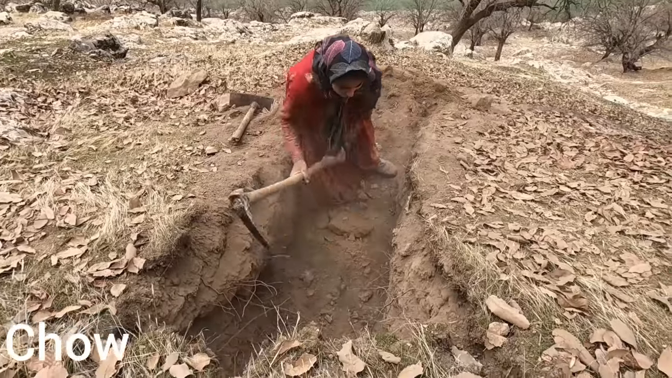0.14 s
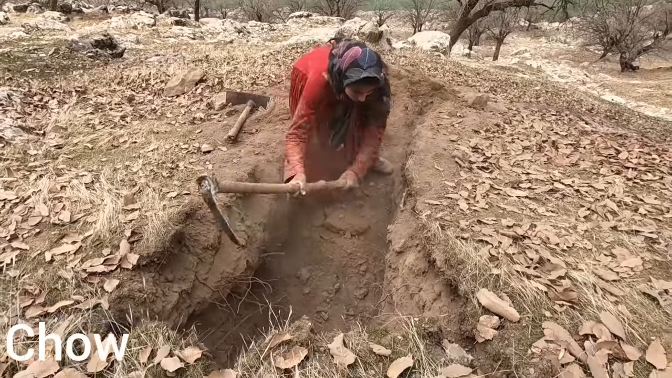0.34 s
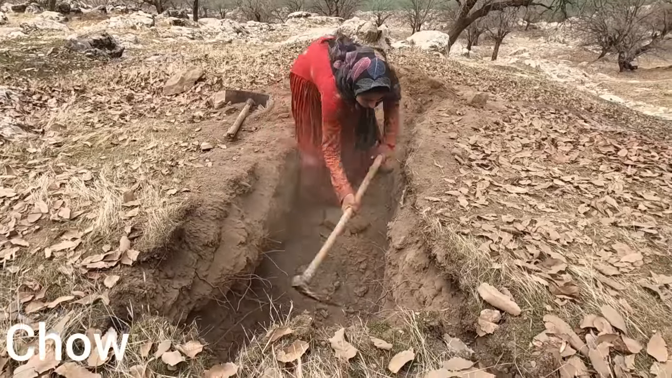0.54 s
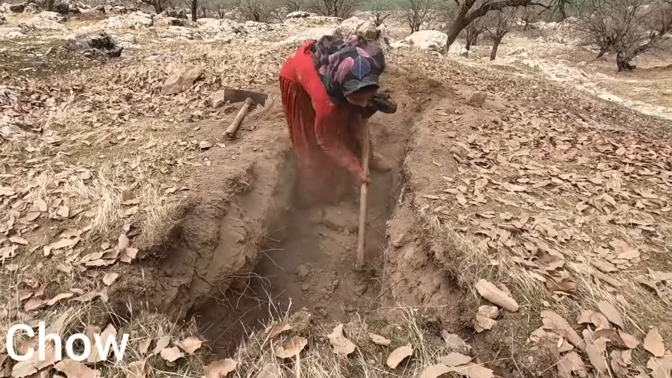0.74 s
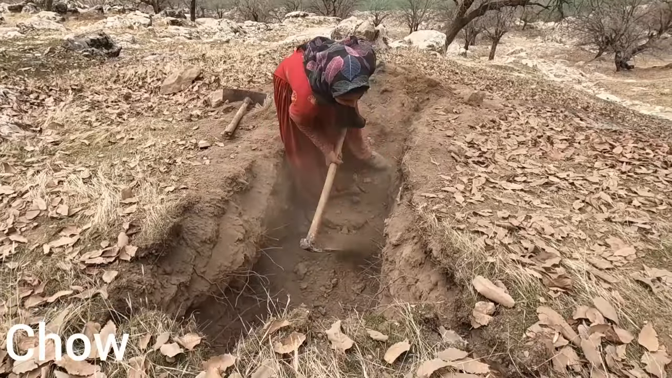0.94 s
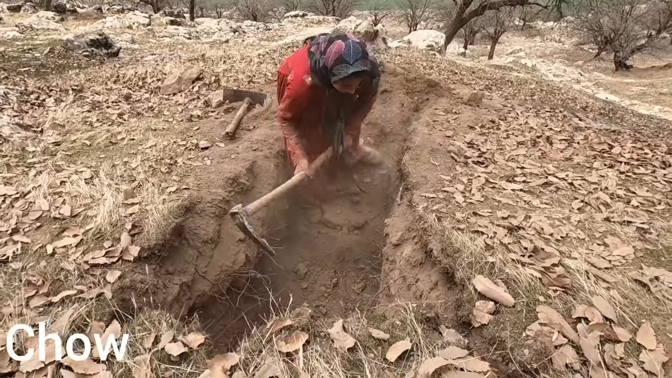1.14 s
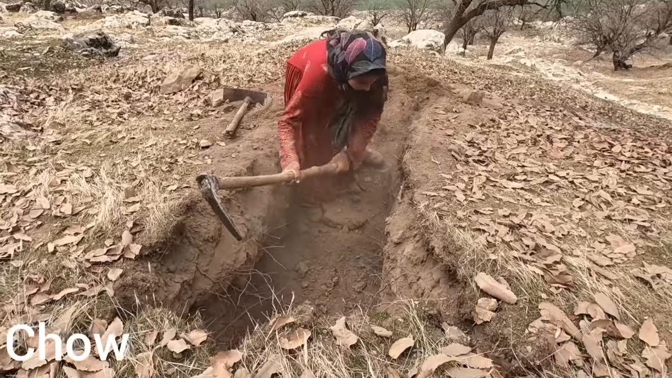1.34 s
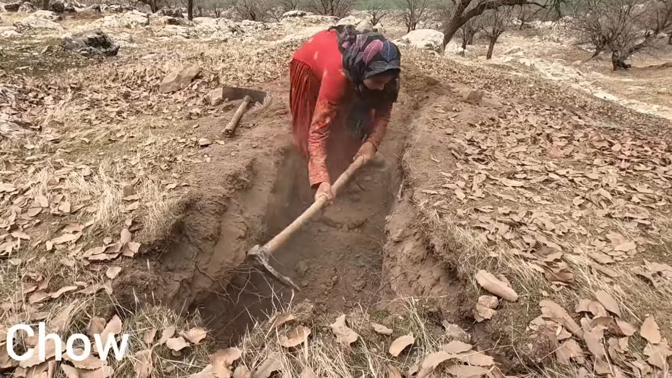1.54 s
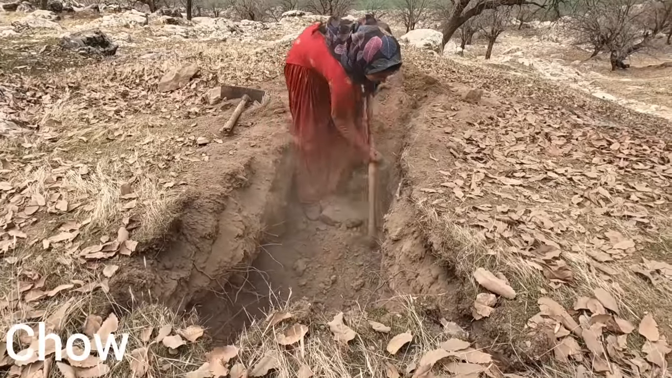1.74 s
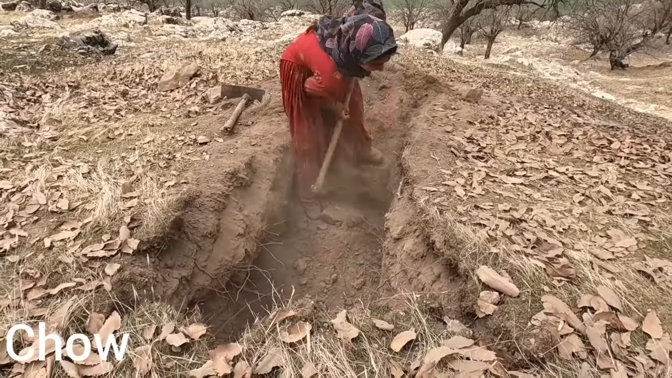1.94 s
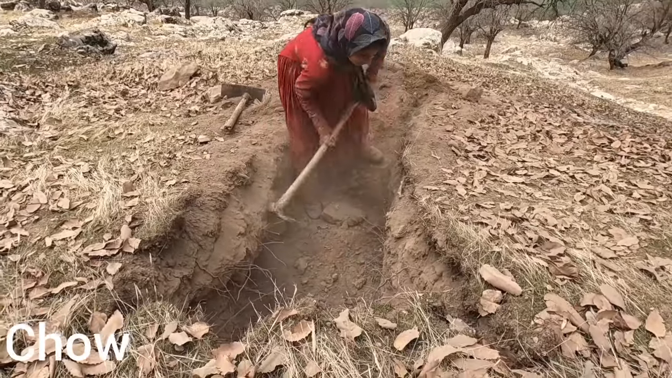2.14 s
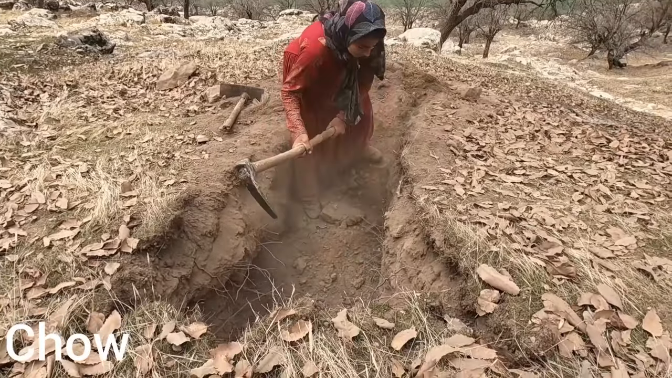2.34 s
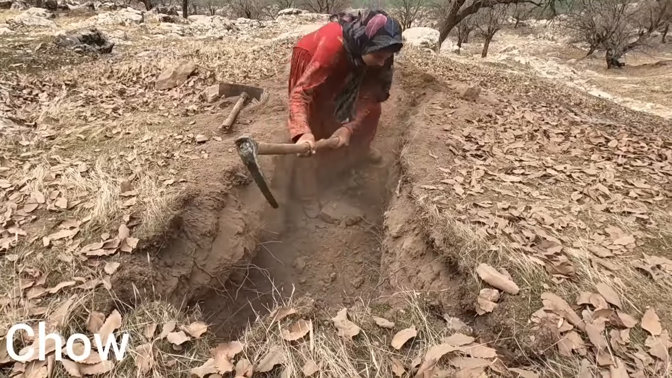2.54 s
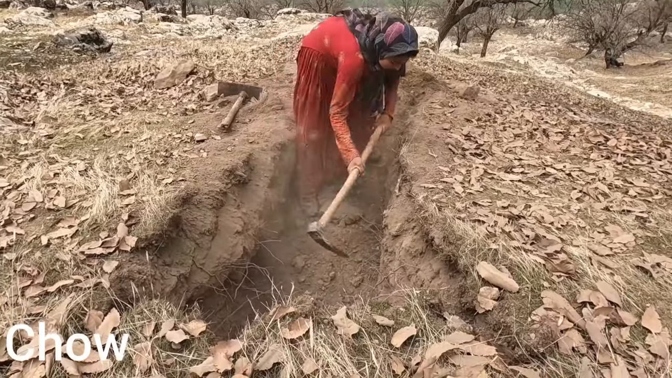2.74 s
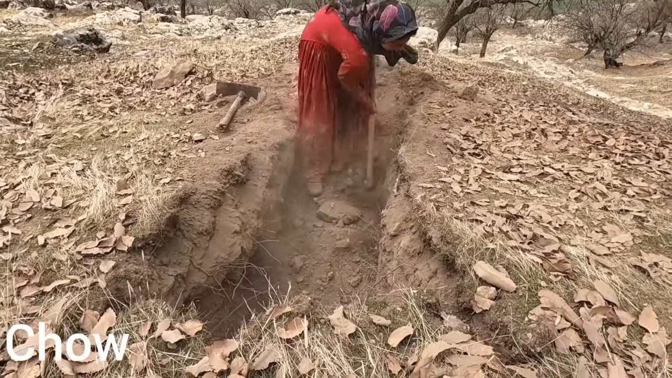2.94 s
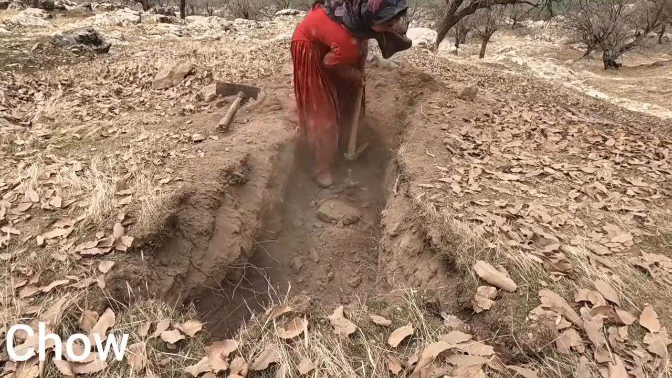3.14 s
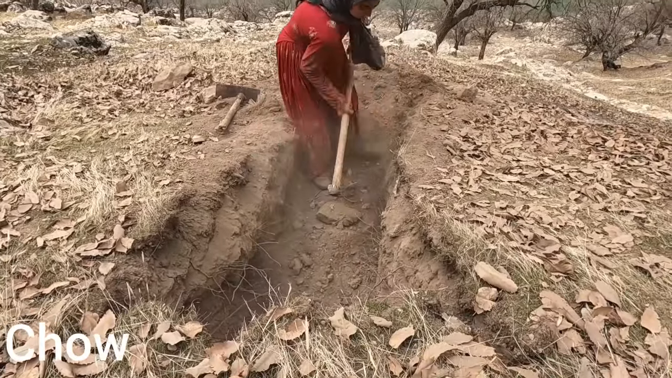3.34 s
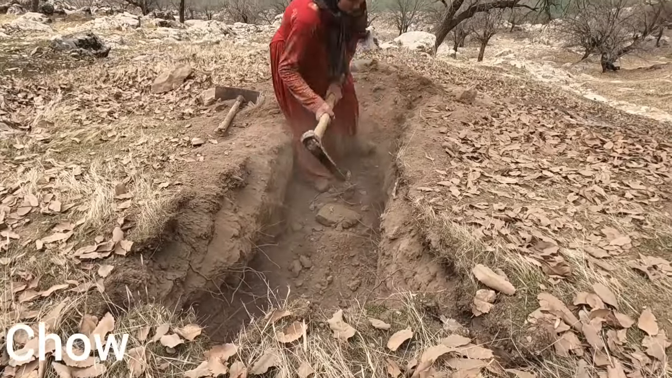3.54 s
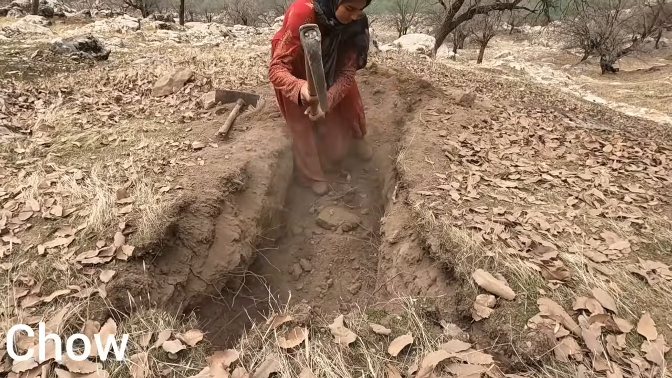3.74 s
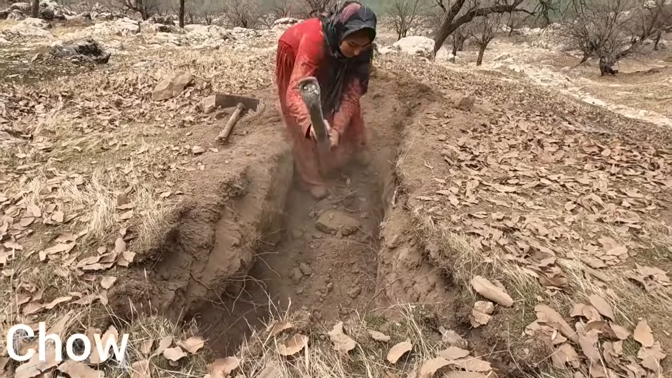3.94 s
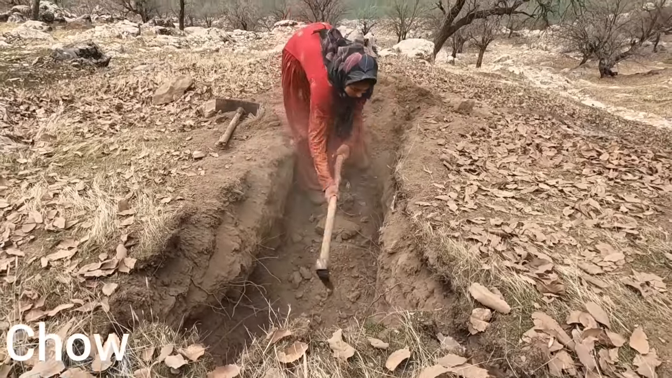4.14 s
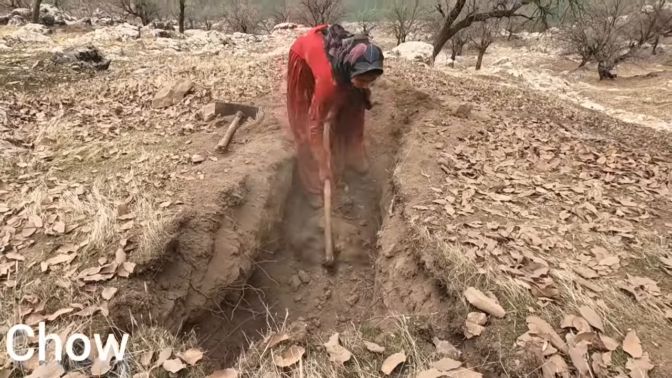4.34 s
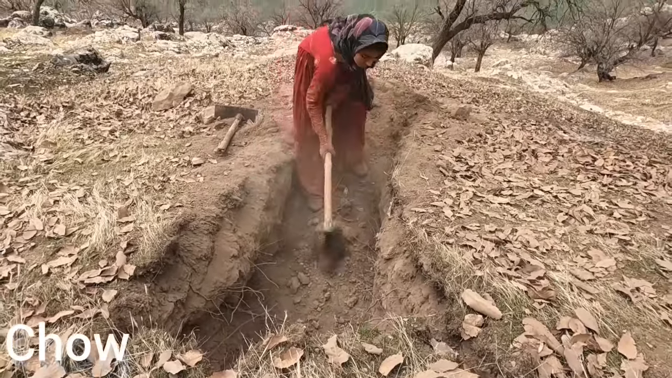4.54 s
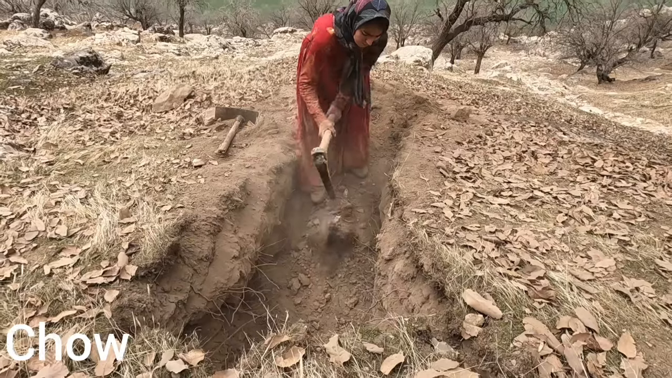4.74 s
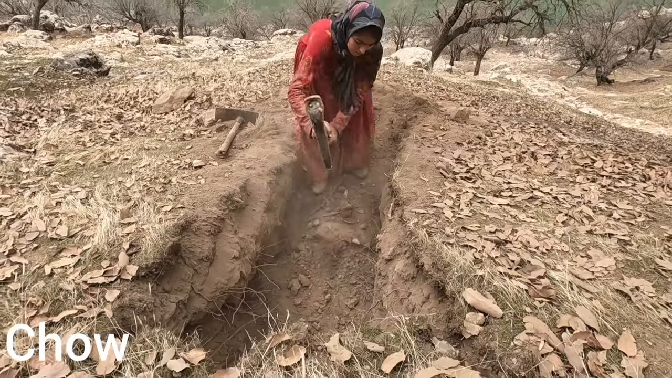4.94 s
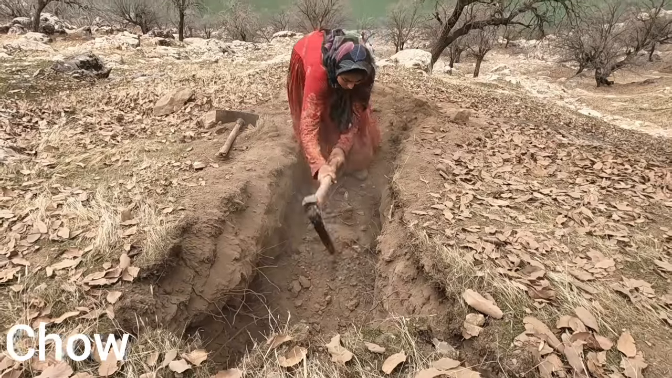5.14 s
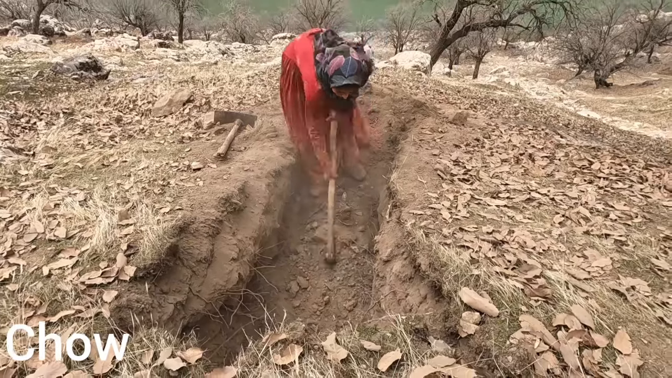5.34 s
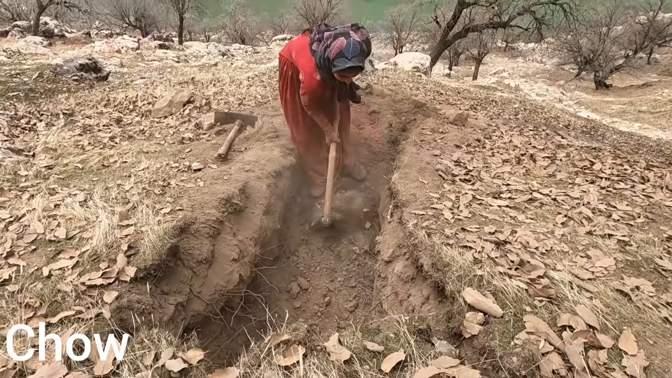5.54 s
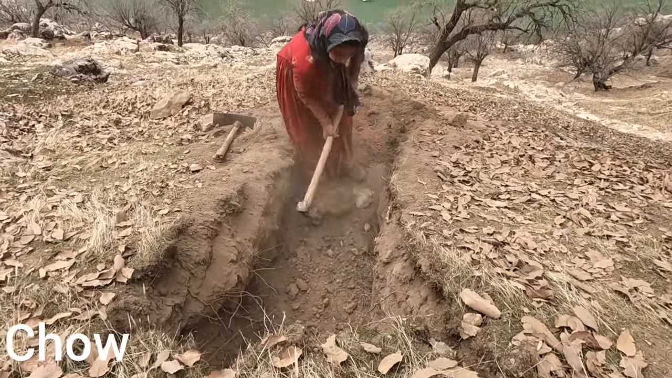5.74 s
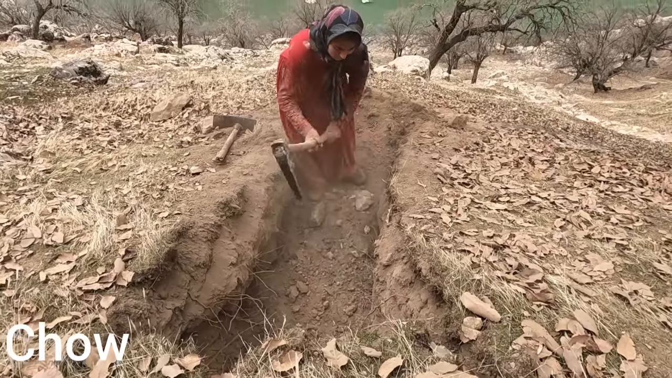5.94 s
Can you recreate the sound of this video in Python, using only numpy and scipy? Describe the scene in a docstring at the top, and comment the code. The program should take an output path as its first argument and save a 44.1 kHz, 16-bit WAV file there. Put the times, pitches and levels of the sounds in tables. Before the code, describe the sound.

A pickaxe digs dry, stony ground outdoors: five blows thud, crunch and knock on buried stones, with loose earth trickling down between them.

```python
"""On an open hillside a pickaxe digs a trench in dry, stony soil with five blows, heard in stereo.
Each blow crunches through grit (bursts of grains), knocks on buried stones (damped modes of the pick
under rough noise) and thuds into the ground (low damped swings). Between blows loosened earth trickles
and clods and pebbles fall back (filtered grains and ringing clicks). A light wind rumbles and a faint
wash lies behind it (filtered noise), and the trench walls scatter a short, weak tail."""
import sys
import numpy as np
from scipy import signal
from scipy.fft import rfft, irfft
from scipy.io import wavfile

SR = 44100
rng = np.random.default_rng(int(sys.argv[2]) if len(sys.argv) > 2 else 0)


def file_out(sig):
    """Save sig as 16-bit WAV at sys.argv[1]."""
    # one column per channel
    cols = np.atleast_2d(sig).T
    # limit, then scale
    lim = np.clip(cols, -1, 1)
    pcm = np.round(lim * 32767).astype(np.int16)
    wavfile.write(sys.argv[1], SR, pcm)


N = 264159
TIME = np.arange(N) / SR
BRIEF = TIME[:SR // 3]  # time axis of one short event


def gain_of(db):
    """Level: decibels become an amplitude ratio."""
    return 10 ** (np.asarray(db) / 20)


def evened(x):
    """Normalisation: scales a signal to rms 1."""
    return x / np.sqrt(np.mean(x ** 2) + 1e-20)


def read(points, hz):
    """Interpolation: reads a curve on a log-frequency axis."""
    point_hz, value = np.transpose(points)
    return np.interp(np.log(hz + 1), np.log(point_hz), value)


def add(mix, s, sound):
    """Superposition: mixes a sound in at time s."""
    part = mix[max(round(s * SR), 0):][:len(sound)]
    part += sound[:len(part)]


def coloured(x, points):
    """Spectral shaping: filters a steady texture by a curve in dB, at rms 1."""
    hz = np.fft.rfftfreq(len(x), 1 / SR)
    spectrum = rfft(x) * gain_of(read(points, hz))
    return evened(irfft(spectrum, len(x)))


def shaped(texture, envelope):
    """Amplitude modulation: lays an envelope on a texture, keeping the envelope's energy."""
    return evened(texture * envelope) * np.sqrt(np.mean(envelope ** 2))


def grains(per_s, spread_db, size):
    """Shot noise: tiny impacts at random times, of random sign and strength."""
    strength = gain_of(spread_db * np.minimum(rng.exponential(1, size), 4))
    sign = rng.choice([-1, 1], size)
    return strength * sign * (rng.random(size) < per_s / SR)


def swell(peak_s):
    """Transient force: a push builds up to 1 at peak_s and dies away."""
    u = BRIEF / peak_s
    return (u * np.exp(1 - u)) ** 2


def bump(hz, centre_hz, octaves):
    """Resonance: a gain of 1 at its centre that falls to half this many octaves away."""
    return 1 / (1 + (np.log2((hz + 1) / centre_hz) / octaves) ** 2)


# Gusts on the microphone. Each row: time of the peak in seconds, level in dB, half-width in seconds
# (where the gust has fallen to 1/e).
GUSTS = [(0.2, -48.5, 0.55), (2.15, -67, 0.2), (3.08, -50, .12), (4.08, -56, 0.17), (4.5, -50.5, 0.18),
         (5.95, -52.5, 0.59)]
CALM_DB = -73.5  # the breeze between gusts


def breeze():
    """Unsteady flow: the wind's strength is a calm with smooth gusts added."""
    gusts = sum(gain_of(db) * np.exp(-((TIME - s) / width_s) ** 2) for s, db, width_s in GUSTS)
    return gain_of(CALM_DB) + gusts


# Spectrum of the open hillside. Each row: frequency in Hz, relative level in dB per Hz.
AIR = [(25, -2.5), (60, -15), (100, -28.5), (170, -3.5), (300, -11), (450, -15), (700, -21.5),
       (1000, -15.5), (1300, -11.5), (1800, -18), (2400, -24), (3400, -36.5), (5500, -31.5), (7800, -28.5),
       (9500, -44), (16000, -51.5)]
AIR_DB = -62.5


def hillside(apart_db=-9, drift_db=0.3):
    """Diffuse field: a faint wash drifts with the breeze, partly incoherent between the ports."""
    shared, apart = (coloured(rng.standard_normal(N), AIR) for _ in range(2))
    apart = signal.lfilter(*signal.butter(1, 500, "high", fs=SR), apart)
    windiness = np.log(breeze())
    swelling = gain_of(drift_db * evened(windiness - windiness.mean()))
    wash = shared + gain_of(apart_db) * np.array([apart, -apart])
    return gain_of(AIR_DB) * swelling * wash


# Spectrum of the wind's rumble. Each row: frequency in Hz, relative level in dB per Hz.
GUST = [(10, 1.5), (30, 1.5), (75, 6.5), (130, -18), (250, -20.5), (600, -55.5), (2000, -75.5)]


def wind(apart_db=-14):
    """Turbulence noise: low buffeting follows the gusts, partly incoherent between the ports."""
    shared, apart = (coloured(rng.standard_normal(N), GUST) for _ in range(2))
    return breeze() * (shared + gain_of(apart_db) * np.array([apart, -apart]))


def scatter(x, near_db=-15, far_db=-36, far_t60=0.54):
    """Reverberation: trench walls and slope scatter a short, weak tail, incoherent between the ports."""
    wall_t60 = 0.035
    tails = []
    for db, t60 in ((near_db, wall_t60), (far_db, far_t60)):
        decaying = rng.standard_normal((2, len(BRIEF))) * gain_of(-60 * BRIEF / t60)
        tails.append(gain_of(db) * evened(decaying) / np.sqrt(len(BRIEF)))  # unit energy times its gain
    tail = signal.lfilter(*signal.butter(2, 600, "high", fs=SR), sum(tails))
    return signal.fftconvolve(x[None], tail, axes=1)[:, :N]


# Treble lost by a small click on its way into the microphone. Each row: frequency in Hz, gain in dB.
DULLING = [(4000, 4), (7800, 3), (9500, -10.5), (12000, -13), (16000, -38)]


def click(hz, t60, octaves, size=3072, rise_s=0.00068, snap=0.79, snap_s=0.000717):
    """Impact response: a snap with irregular ringing around a stone's own pitch; snap is its power share."""
    t, bins = TIME[:size], np.fft.rfftfreq(size, 1 / SR)
    colour = bump(bins, hz, octaves) * gain_of(read(DULLING, bins))
    ringing = irfft(colour * np.exp(2j * np.pi * rng.random(len(bins))), size)
    impulse = irfft(colour * np.exp(-2j * np.pi * bins * snap_s), size)  # in phase at snap_s
    dying = gain_of(-60 * t / t60) * (1 - np.exp(-t / rise_s))
    return np.sqrt(snap) * shaped(impulse, dying) + np.sqrt(1 - snap) * shaped(ringing, dying)


def gravel(low_hz, high_hz, per_s, spread_db, t60, octaves=0.84, count=10):
    """Superposed impacts: pebbles of several sizes, each with its pitch, fall at random; rms 1."""
    total = 0
    for hz in np.geomspace(low_hz, high_hz, count):
        falls = grains(per_s / count, spread_db, N)
        total = total + signal.oaconvolve(falls, click(hz, t60, octaves))[:N]
    return evened(total)


def clumps(depth_db, length_s):
    """Random modulation: soil falls in clumps, a gain of rms 1 that varies over about length_s."""
    hz = np.fft.rfftfreq(N, 1 / SR)
    slow = irfft(rfft(rng.standard_normal(N)) * np.exp(-(hz * length_s) ** 2), N)
    return evened(gain_of(depth_db * evened(slow)))


def flow(s, rise_s, run_s, t60):
    """Granular flow: a slide of earth gathers, runs for a while and settles exponentially."""
    gathering = np.clip((TIME - s) / rise_s, 0, 1)
    return gathering * gain_of(-60 * np.maximum(TIME - s - rise_s - run_s, 0) / t60)


# Loose earth thrown up by a blow, dragged by the blade or shuffled underfoot.
# Each row: start in seconds, rise in seconds, run in seconds, t60 of the settling in seconds,
# then the strengths in dB of the sandy hiss, the coarser crumbs and the soft clods.
SLIDES = [(0, 0.0033, 0.062, 0.81, -61, -58, -53), (0.22, 0.033, .08, .5, -75, -69, -52),
          (0.72, 0.0078, 0.19, 0.86, -59.5, -55, -52.5), (0.98, 0.094, .22, 1.7, -61.5, -58.5, -76),
          (1.769, 0.014, 0.016, 0.5, -46, -41.5, -35.5), (1.88, 0.073, 0.056, 0.94, -54, -52, -46.5),
          (2.12, 0.014, 0.065, 0.27, -60, -59, -49), (2.949, 0.015, 0.015, 0.43, -55.5, -46.5, -32.5),
          (3.028, 0.02, 0.12, 0.65, -55.5, -51.5, -43), (3.879, 0.28, .18, 0.41, -91, -70.5, -70),
          (4.308, 0.0088, 0.0069, 0.31, -54, -42, -43), (4.418, 0.064, 0.072, 1.76, -56.5, -54.5, -54.5),
          (4.799, 0.064, 0.065, 0.78, -57, -51.5, -53.5), (5.43, 0.021, 0.023, 1.28, -58.5, -48, -45),
          (5.679, 0.01, 0.18, 0.34, -56.5, -51.5, -40.5), (5.78, 0.027, 0.12, 0.33, -61, -55.5, -46.5)]
CLOD_SETTLING = 0.79  # clods come to rest in this share of the sand's time
# sand keeps running off the trench walls, in spurts of this depth and length
TRICKLE_DB, TRICKLE_SPURT_DB, TRICKLE_SPURT_S = -78, 2.5, 0.047


def slides():
    """Addition of powers: how much sand, how many crumbs and how many clods are on the move."""
    power = np.zeros((3, N))
    for s, rise_s, run_s, t60, fine_db, coarse_db, heavy_db in SLIDES:
        running = flow(s, rise_s, run_s, t60)
        tumbling = flow(s, rise_s, run_s, t60 * CLOD_SETTLING)
        moving = [gain_of(fine_db) * running, gain_of(coarse_db) * running, gain_of(heavy_db) * tumbling]
        power += np.array(moving) ** 2
    power[0] += (gain_of(TRICKLE_DB) * clumps(TRICKLE_SPURT_DB, TRICKLE_SPURT_S)) ** 2
    return np.sqrt(power)


# Spectra of running sand, of crumbs and of soft clods.
# Each row: frequency in Hz, relative level in dB per Hz.
SAND = [(1500, -21.5), (3000, -6.5), (5000, -2), (7500, 0.5), (8500, -5), (9600, -11), (12000, -23),
        (16000, -37.5)]
CRUMBS = [(200, -5.5), (450, -1), (700, -6), (1300, 5), (2200, 2.5), (3500, 0.5), (5500, -34.5),
          (10000, -43.5)]
CLODS = [(30, -28), (80, -2), (150, 6.5), (250, -6.5), (400, -13.5), (700, -18.5), (2000, -71.5)]


def spill(sand_db=-3, chips_db=-4, pebbles_db=-5, crumbs_db=-4, lumps_db=-7, clods_db=-2):
    """Granular noise: soil rains back as sand, stone chips and pebbles, crumbs, small lumps and clods."""
    fine, coarse, heavy = slides()
    sand = gain_of(sand_db) * coloured(grains(per_s=4000, spread_db=-3.0, size=N), SAND)
    chips = gain_of(chips_db) * gravel(low_hz=3470, high_hz=9220, per_s=130, spread_db=2.0, t60=0.0058)
    pebbles = gain_of(pebbles_db) * gravel(low_hz=4220, high_hz=7300, per_s=22, spread_db=0.5,
                                           t60=0.01, octaves=0.4)
    crumbs = gain_of(crumbs_db) * coloured(grains(per_s=4400, spread_db=3.5, size=N), CRUMBS)
    lumps = gain_of(lumps_db) * gravel(low_hz=656, high_hz=3130, per_s=160, spread_db=3, t60=0.016)
    clods = gain_of(clods_db) * coloured(grains(per_s=200, spread_db=0.5, size=N), CLODS)
    uneven = clumps(depth_db=2.9, length_s=0.01)
    clumped = uneven * (fine * (sand + chips) + coarse * (crumbs + lumps))
    return clumped + fine * pebbles + heavy * clods


# Larger stones that land or are kicked by the blade. Each row: start in seconds, level in dB,
# pitch in Hz, spread of the ring in octaves.
STONES = [(0.067, -36.5, 6340, 0.97), (0.2235, -40, 6700, 0.26), (0.855, -26.5, 1960, 1),
          (0.8727, -28.5, 6030, 1.5), (1.1044, -24.5, 2500, 0.87), (1.167, -27.5, 4800, 0.19),
          (1.1718, -26.5, 5000, 0.83), (1.2215, -25, 5950, .77), (1.2503, -24, 5400, 0.83),
          (1.272, -30.5, 4770, 0.94), (1.486, -33.5, 4500, 0.83), (1.8392, -26, 6000, .85),
          (1.8902, -28.5, 4000, 1.2), (1.935, -26, 5360, 0.26), (1.9935, -29, 6800, 0.86),
          (2.014, -24, 4000, 0.56), (2.131, -30, 2070, 0.61), (2.173, -27.5, 3800, 1.4),
          (2.178, -34, 1110, 0.31), (2.222, -32, 8400, 0.4), (2.4052, -24, 4970, 0.39),
          (2.4056, -41, 1500, 1.2), (2.7575, -40, 5080, 0.59), (2.9513, -12.5, 830, 0.52),
          (2.954, -19, 420, .25), (3.0067, -26.5, 6340, .56), (3.069, -34, 875, .54),
          (3.1195, -32.5, 1130, 0.53), (3.206, -29.5, 2430, 0.82), (3.4354, -39.5, 6700, .57),
          (4.1296, -38.5, 4200, 1.34), (4.441, -32, 7700, 0.46), (4.519, -37, 930, .35),
          (4.89, -36, 430, 0.28), (5.008, -41, 1010, 0.27), (5.3447, -34, 5750, 0.83),
          (5.682, -20, 1860, 0.21), (5.738, -32, 690, 0.4), (5.7912, -24, 660, 0.31),
          (5.798, -10, 2600, 0.65), (5.808, -24.5, 2260, 0.43), (5.9125, -35, 3630, .54),
          (5.948, -36.5, 3367, 1.1)]
# a stone of this pitch rings so long; bigger, lower stones ring longer
STONE_T60_S, STONE_HZ, STONE_RING_SLOPE = 0.0064, 4760, 0.58


def stones():
    """Scaling of resonators: single stones click, and the lower the pitch the longer the ring."""
    out = np.zeros(N)
    for s, db, hz, octaves in STONES:
        t60 = STONE_T60_S * (STONE_HZ / hz) ** STONE_RING_SLOPE
        add(out, s, gain_of(db) * click(hz, t60, octaves))
    return out


def heave(hz, peak_s):
    """Damped oscillation: earth swings briefly under a push."""
    return swell(peak_s) * np.sin(2 * np.pi * hz * BRIEF)


# The ground takes a blow or a falling clod. Each row: start in seconds, level in dB, pitch of the heave
# in Hz, time to the peak in seconds, weight of the crust in dB, weight of the subsoil in dB.
THUDS = [(0.713, -16, 102, 0.0059, -11, -22), (0.739, -31, 93, 0.0076, -20, -20),
         (0.845, -30.5, 185, 0.004, -17, -18), (1.768, -14.5, 83.5, 0.0097, -0.5, -9),
         (1.795, -27.5, 62.5, 0.021, -25, -11.5), (2.13, -39, 156, 0.01, -14, -29),
         (2.877, -21.5, 204, 0.0076, -5, -12), (2.939, -11, 112, 0.0045, -15, -14.5),
         (2.953, -21.5, 137, 0.011, 2, -4), (2.968, -28, 90, .011, -19, -15),
         (4.298, -11.5, 58.6, 0.015, -15, -18), (4.306, -20, 136.4, 0.011, -8.5, -4),
         (4.447, -37, 152, 0.0049, -21, -16), (5.411, -13, 93.5, 0.0057, -32, -19),
         (5.430, -12, 143.6, 0.0077, -8, -8), (5.707, -28, 74.4, 0.017, -23, -20),
         (5.790, -24, 168, 0.0023, -10.5, -28)]
# The dry crust gives way just after the heave. Each row: pitch in Hz, relative level in dB,
# delay in seconds, time to the peak in seconds.
CRUST = [(168, -8, 0.0056, 0.014), (238, -0.5, 0.00712, 0.0042), (372.4, -15.5, .005, 0.0043)]
# Spectrum of packed earth shuddering. Each row: frequency in Hz, relative level in dB per Hz.
GROUND = [(20, -13.5), (50, -3.5), (90, 3), (150, -4), (260, -11), (420, -16), (700, -32), (2000, -61.5)]
SUBSOIL_HZ, SUBSOIL_PEAK_S = 49.7, 0.015  # the slow, deep sag under a blow


def thuds(shudder_db=-18, shudder_t60=0.34):
    """Heavily damped modes: packed earth heaves over its subsoil, the crust gives way, the ground shudders."""
    out = np.zeros(N)
    for s, db, hz, peak_s, crust_db, subsoil_db in THUDS:
        dying = gain_of(shudder_db - 60 * BRIEF / shudder_t60) * (1 - np.exp(-BRIEF / peak_s))
        shudder = shaped(coloured(rng.standard_normal(len(BRIEF)), GROUND), dying)
        sag = gain_of(subsoil_db) * heave(SUBSOIL_HZ, SUBSOIL_PEAK_S)
        add(out, s, gain_of(db) * (heave(hz, peak_s) + sag + shudder))
        for mode_hz, mode_db, delay_s, mode_peak_s in CRUST:
            add(out, s + delay_s, gain_of(db + crust_db + mode_db) * heave(mode_hz, mode_peak_s))
    return out


# The blade shears through grit. Each row: start in seconds, level in dB, time to the peak in seconds,
# weight of the low-mid body in dB.
CRUNCHES = [(0.696, -35, 0.012, -17), (0.709, -28.5, 0.0089, -1), (1.754, -27.5, 0.0097, 2.5),
            (1.773, -28.5, 0.0017, 6), (1.8325, -33.5, 0.0019, -1), (1.989, -47, 0.0099, -6),
            (2.869, -33, 0.0025, -3.5), (2.885, -51.5, .04, 10), (4.279, -33.5, 0.0036, 0),
            (4.289, -22, 0.0022, -9), (4.3, -22, 0.0051, -7), (4.311, -34, 0.0074, 5.5),
            (5.419, -27.5, 0.0039, 0), (5.4286, -18, 0.0017, 2.5), (5.787, -43, 0.003, -9)]
# Spectra of breaking grit: its fine sizzle and its coarse body.
# Each row: frequency in Hz, relative level in dB per Hz.
SIZZLE = [(1000, -7), (3000, -12.5), (4500, -12.5), (6000, -2), (7000, 1), (8300, -5), (9500, -16),
          (12000, -27), (16000, -42)]
BODY = [(100, -1.5), (300, 5.5), (550, -11), (900, -4.5), (1300, -3), (2200, -5.5), (4000, -5.5),
        (6000, -13), (12000, -46.5)]


def crunches():
    """Fracture noise: each advance of the blade crushes a burst of grit."""
    out = np.zeros(N)
    for s, db, peak_s, body_db in CRUNCHES:
        sizzle, body = (
            shaped(coloured(grains(per_s=7600, spread_db=7.0, size=len(BRIEF)), colour), swell(peak_s))
            for colour in (SIZZLE, BODY))
        add(out, s, gain_of(db) * (sizzle + gain_of(body_db) * body))
    return out


# Steel meets stone. Each row: start in seconds, level in dB, t60 of the contact in seconds,
# brightness (low-pass cutoff) in Hz, weight of the rough crack in dB, after-ring of the pick in dB,
# pitch that the contact point favours in Hz.
KNOCKS = [(0.695, -39, 0.073, 8000, -15, -3, 3700), (0.7104, -28.5, 0.048, 4000, -6, -7, 1180),
          (0.8447, -27.5, 0.064, 5400, -5.5, -25, 3600), (1.76, -23.5, 0.098, 5400, -7, -22, 3600),
          (1.763, -19.5, 0.079, 5560, -7, -19, 1170), (1.775, -20.5, 0.024, 3220, -3.5, -17, 1180),
          (2.8714, -8, 0.015, 6270, -13, -12.5, 1800), (2.8726, -9, .019, 8020, -13.5, -11, 3770),
          (2.8942, -30.5, 0.052, 2800, -7, -5.5, 1820), (2.953, -13, .022, 3370, 0, -14, 3100),
          (2.952, -22, 0.022, 9000, -11, -25, 6580), (2.9724, -31.5, 0.039, 2170, -2, -1, 1200),
          (4.2905, -10.5, 0.032, 3570, -11, -33, 1590), (4.3073, -23.5, 0.099, 4500, -2, -16, 3170),
          (5.4026, -19.5, 0.029, 9200, -3.5, -17, 6600), (5.4116, -17, 0.035, 2460, -4, -27, 1680),
          (5.4318, -7, 0.018, 6160, -6, -16, 2350), (5.696, -16, 0.009, 2440, -6, -30, 1350)]
# Modes of the pick's head and haft. Each row: frequency in Hz, relative level in dB while pressed on stone,
# relative level in dB ringing free, free t60 in seconds.
PICK = [(1172.5, 1.5, -1, .11), (1339, 0, -29.5, 0.055), (1602, 1, -2, .09), (1815, -1, -6, 0.25),
        (1883, 5, -16.5, .1), (2352, -0.5, -15.5, .1), (3088, -1.5, -13.5, 0.22), (3670, -7, -2.5, 0.052),
        (3835, -4, -8, 0.11), (5450, -9.5, -23.5, 0.11), (6700, 3, -21, 0.17), (7500, -16.5, -21, 0.13)]
# Spectrum of the contact's rough crack. Each row: frequency in Hz, relative level in dB per Hz.
CRACK = [(100, -9), (400, 10), (650, -16), (950, -8.5), (1300, 9), (2000, -3), (2800, 0.5), (3700, -2),
         (4800, -11.5), (7000, -4.5), (9000, -15), (15000, -30.5)]


def knocks(modes_db=-2, rise_s=0.00072, favour_db=10, favour_octaves=0.11, detune=0.012):
    """Modal damping: pressed on stone the pick's modes die fast under a crack; a faint free ring follows."""
    out = np.zeros(N)
    hz, pressed_db, free_db, free_t60 = np.transpose(PICK)[:, :, None]
    for s, db, t60, bright_hz, crack_db, ring_db, favoured_hz in KNOCKS:
        # modes that move most at the contact point are struck hardest
        weight = gain_of(favour_db * (bump(hz, favoured_hz, favour_octaves) - 1.5))
        tones = weight * np.sin(2 * np.pi * (hz * BRIEF + rng.random(hz.shape)))
        # the stone's load shifts each mode
        pushed_hz = hz * (1 + detune * rng.standard_normal(hz.shape))
        pushed_tones = weight * np.sin(2 * np.pi * (pushed_hz * BRIEF + rng.random(hz.shape)))
        pressed = evened((gain_of(pressed_db) * pushed_tones).sum(0))
        crack = coloured(rng.standard_normal(len(BRIEF)), CRACK)
        softness = signal.butter(2, min(bright_hz, SR / 3), fs=SR)  # a softer contact loses treble
        contact = signal.lfilter(*softness, gain_of(modes_db) * pressed + gain_of(crack_db) * crack)
        ring = (gain_of(ring_db + free_db - 60 * BRIEF / free_t60) * tones).sum(0)
        blow = shaped(contact, gain_of(-60 * BRIEF / t60)) + ring
        add(out, s, gain_of(db) * blow * (1 - np.exp(-BRIEF / rise_s)))
    return out


def scene():
    """Superposition: the digging, its scatter, and the air around it."""
    digging = knocks() + crunches() + thuds() + stones() + spill()
    return digging + scatter(digging) + wind() + hillside()


# The pair of microphone ports. Each row: frequency in Hz, left minus right level in dB.
PORTS = [(150, -.2), (400, -.7), (850, -2.2), (1400, -1.6), (3800, -2), (5500, -.4), (8500, 1.8),
         (14000, .6)]
# Delay between the ports. Each row: frequency in Hz, phase in radians by which left lags.
LAG = [(400, 0), (900, .18), (1900, .3), (3800, .68), (5700, .26), (7000, .1), (12000, .25)]
# Sound that reaches the two ports by different paths. Each row: frequency in Hz,
# depth of the phase ripple in dB relative to one radian.
APART = [(100, -31), (250, -27), (600, -23), (2000, -18), (4500, -14), (7500, -14), (12000, -6)]
CEILING = 0.85  # amplitude that the rounding approaches
EDGE_HZ = 16200  # upper band limit
DETOUR_T60_S = 0.008


def record(dry):
    """Two-port reception: delay and colour differ, peaks saturate softly, then the band is limited."""
    hz, t = np.fft.rfftfreq(N, 1 / SR), TIME[:512]
    # echoes from close beside the microphone ripple the lag between the ports
    detours = rng.standard_normal(len(t)) * gain_of(-60 * t / DETOUR_T60_S)
    ripple = gain_of(read(APART, hz)) * evened(rfft(detours, N).imag)
    half_lag = read(LAG, hz) / 2 + ripple
    # left takes half of the difference, right the inverse half
    half = gain_of(read(PORTS, hz) / 2) * np.exp(-1j * half_lag)
    heard = irfft(rfft(dry) * np.array([half, 1 / half]), N)
    rounded = heard / (1 + (heard / CEILING) ** 4) ** (1 / 4)
    band = signal.firwin(255, EDGE_HZ, window=("kaiser", 9), fs=SR)
    return signal.oaconvolve(rounded, band[None], "same")


dry = scene()
out = record(dry)
file_out(out)
```